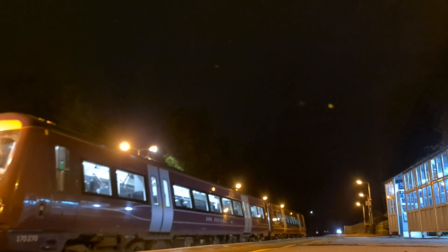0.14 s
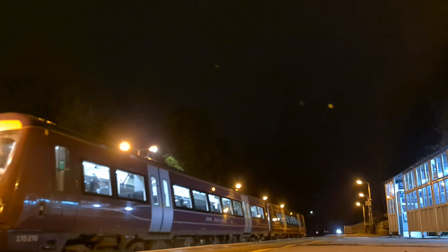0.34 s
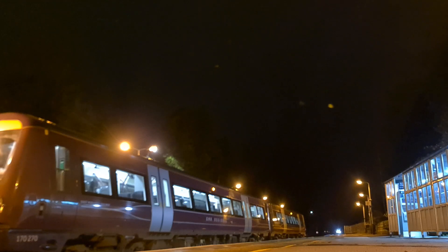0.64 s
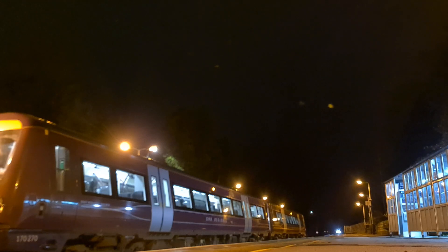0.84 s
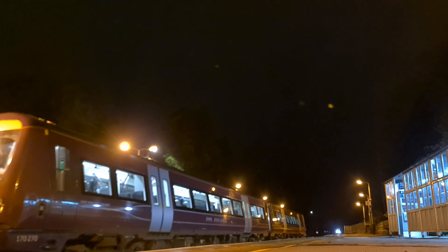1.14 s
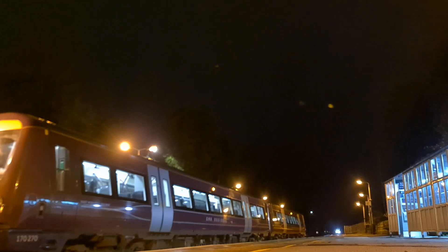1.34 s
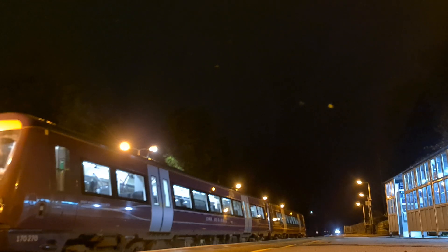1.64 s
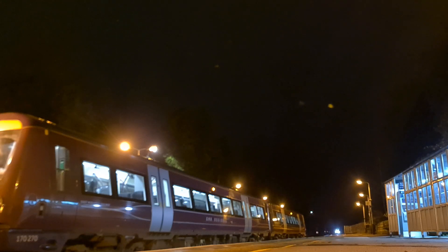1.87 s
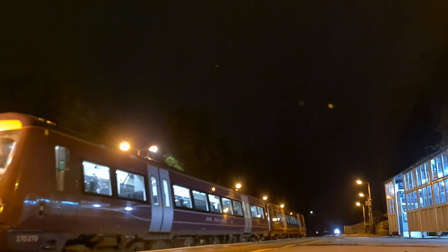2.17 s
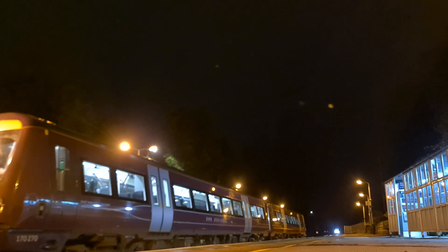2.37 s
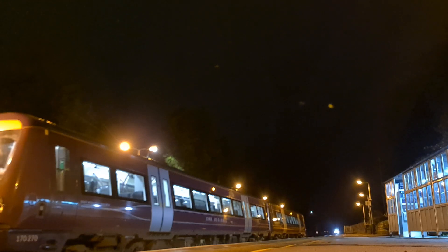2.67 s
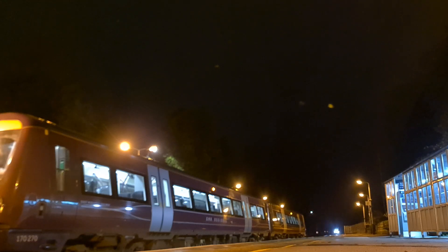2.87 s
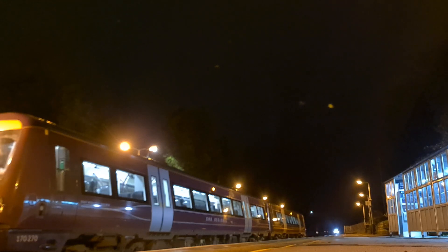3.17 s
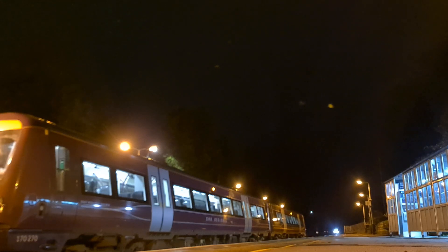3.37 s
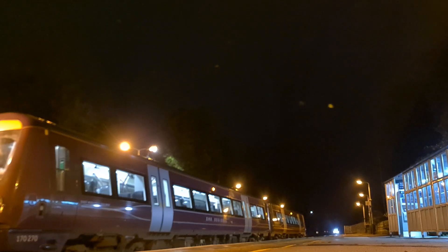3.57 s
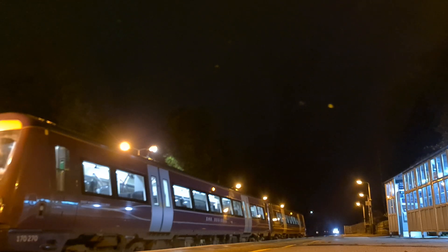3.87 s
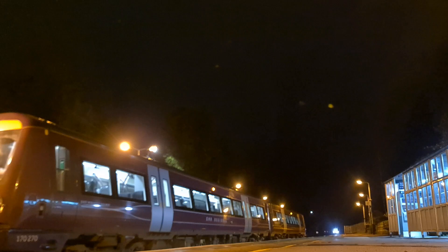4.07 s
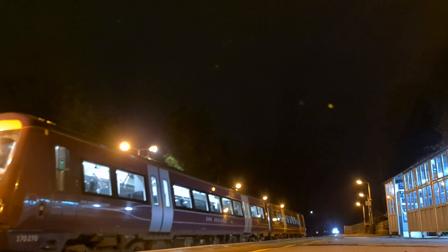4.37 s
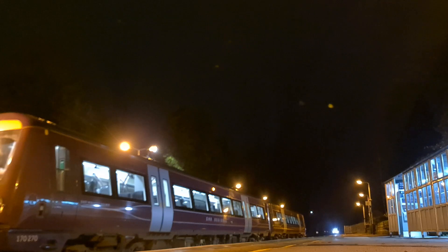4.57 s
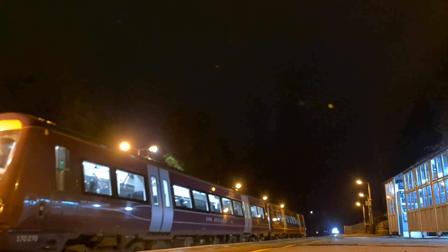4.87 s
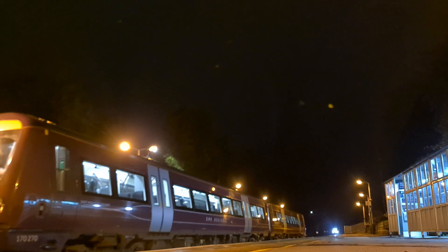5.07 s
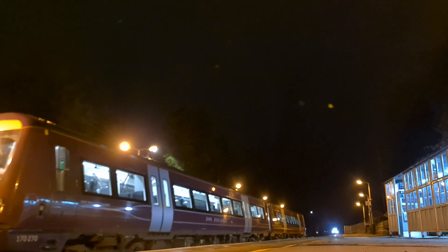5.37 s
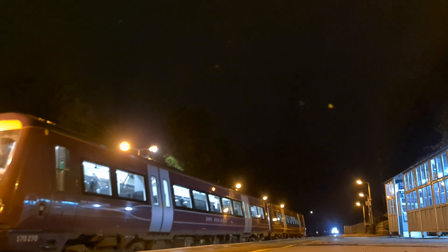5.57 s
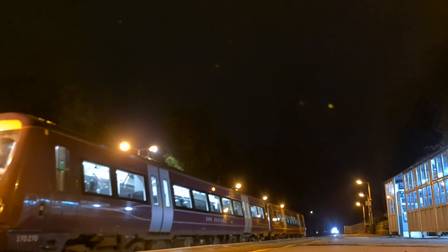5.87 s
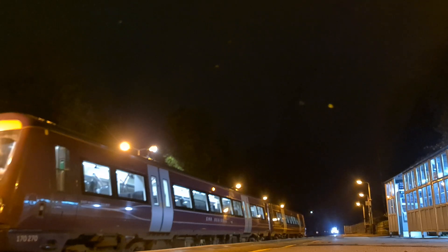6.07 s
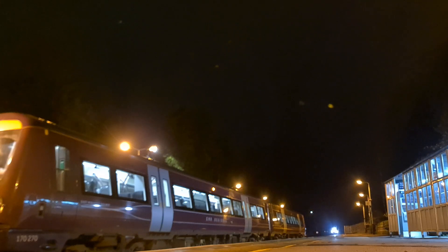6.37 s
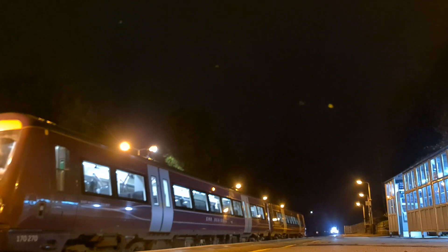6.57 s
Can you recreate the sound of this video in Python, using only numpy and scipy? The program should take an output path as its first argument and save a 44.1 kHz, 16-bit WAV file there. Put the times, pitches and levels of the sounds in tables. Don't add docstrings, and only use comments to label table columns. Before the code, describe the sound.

Two brief echoing horn toots, high then low, over a steady diesel idle; then distant locomotive throb and rail hiss swell steadily nearer.

```python
import sys
import numpy as np
from scipy import signal
from scipy.fft import rfft, irfft, next_fast_len
from scipy.io import wavfile
from scipy.ndimage import uniform_filter1d

SR = 44100
rng = np.random.default_rng(int(sys.argv[2]) if len(sys.argv) > 2 else 0)


def field_ratio(decibels):
    return 10 ** (np.asarray(decibels, dtype=float) / 20)


def digitize_waveform(pressure):
    field = np.atleast_2d(pressure).T
    bounded = np.clip(field, -1, 1)
    quanta = np.round(bounded * 32767).astype(np.int16)
    wavfile.write(sys.argv[1], SR, quanta)


N = 295911

# time in seconds, leading engine, trailing engine and rolling noise in dB,
# 0 = as loud as near the end.
APPROACH = [(0, -26, -20, -32), (1.2, -18.5, -15, -20.5), (2.2, -31.5, -13, -32), (3.1, -10.5, -9.5, -17.5),
            (3.8, -14.5, -2.5, -12), (4.4, -6.5, -6.5, -9.5), (4.9, 0.5, -1.5, -12), (5.5, 1, -3, -10.5),
            (5.9, -3.5, -2.5, -7.5), (6.15, -1.5, -0.5, -6), (6.32, 0, 4, -2.5), (6.5, -4.5, 4, -1.5),
            (6.71, -12, 4, 2.5)]
PORT_LAG_SAMPLES = 7.0


def read_log_hz(hz, at_hz, value):
    return np.interp(np.log(hz + 1), np.log(np.array(at_hz) + 1), value)


def evened(x):
    return x / np.sqrt(np.mean(x ** 2) + 1e-20)


def drift(rate_hz, t):
    coarse_t = t[::64]
    wander = sum(np.sin(2 * np.pi * (hz * coarse_t + rng.random())) / np.sqrt(hz)
                 for hz in np.geomspace(rate_hz / 20, rate_hz, num=20))
    return np.interp(t, coarse_t, evened(wander))


def ports(x, lag_samples, balance_db):
    size = next_fast_len(len(x))
    delay = np.exp(-2j * np.pi * np.fft.rfftfreq(size) * lag_samples)
    left = irfft(rfft(x, size) * delay, size)[:len(x)]
    return np.array([left * field_ratio(balance_db / 2), x * field_ratio(-balance_db / 2)])


def bell(hz, centre_hz, width_hz):
    return 1 / (1 + ((hz - centre_hz) / (width_hz / 2)) ** 2)


def band(x, centre_hz, width_hz):
    hz = np.fft.rfftfreq(len(x), 1 / SR)
    return irfft(rfft(x) * bell(hz, centre_hz, width_hz), len(x))


def noise(shape, size, patchy_db, peaks=()):
    # frequency in Hz, likeness of the ports 0-1, left-right balance in dB.
    port_match = [(60, .99, -.3), (180, .93, -.4), (350, .9, -.3), (620, .74, 0), (1000, .21, .4),
                  (1800, .41, 0), (3300, .54, -2.4), (4800, .22, -2.4), (8000, .2, -4.5), (10500, .05, -2),
                  (14000, .05, -.5)]
    frames = 4 * N // size + 5
    hz = np.fft.rfftfreq(size, 1 / SR)
    a, b, c, d, patches = rng.standard_normal((frames, len(hz), 5)).T
    patches = uniform_filter1d(patches, size=9, axis=0)
    patches = evened(uniform_filter1d(patches, size=7, axis=1))

    at_hz, same, balance_db = np.transpose(port_match)
    same = np.clip(read_log_hz(hz, at_hz, same), 0, 1)[:, None]
    lag = np.exp(-2j * np.pi * hz * PORT_LAG_SAMPLES / SR)[:, None]
    right = a + 1j * b
    left = same * lag * right + np.sqrt(1 - same ** 2) * (c + 1j * d)
    tilt = field_ratio(read_log_hz(hz, at_hz, balance_db) / 2)[:, None]

    db = read_log_hz(hz, *np.transpose(shape))
    db = db + sum(gain_db * bell(hz, f, width_hz) for f, width_hz, gain_db in peaks)
    spectra = np.array([left * tilt, right / tilt]) * field_ratio(db[:, None] + patchy_db * patches)
    return evened(signal.istft(spectra, nperseg=size, noverlap=3 * size // 4)[1][:, :N])


def railcar(t):
    # frequency in Hz, density in dB per Hz.
    idle_shape = [(24, -13), (45, -4.5), (95, -10.5), (220, -14), (420, -15), (580, -19.5), (1000, -19.5),
                  (1550, -24.5), (2200, -30.5), (4400, -40), (5300, -48.5), (7200, -60.5), (12000, -64),
                  (15700, -73)]
    # frequency in Hz, width in Hz, gain in dB.
    panels = [(1094, 140, 7.5), (1361, 110, 4), (1761, 140, 8.5), (830, 46, 5), (4760, 65, 11),
              (157, 27.4, -12.5), (2600, 260, 2), (9030, 1200, 6.5)]
    # frequency in Hz, rms level in dB.
    hum_lines = [(40.05, -44), (81.7, -47), (120, -49), (179.8, -51), (196, -53), (211, -52), (229, -53),
                 (240.2, -51), (245.4, -50), (294, -55), (360, -57), (408, -58)]
    firing_hz, idle_db = 39.8, -33.5
    firings = np.cumsum(firing_hz * (1 + 0.025 * drift(6, t))) / SR
    knock = 1 + 0.055 * np.cos(2 * np.pi * firings)
    knock += 0.016 * np.cos(2 * np.pi * firings / 6)
    level = field_ratio(idle_db + 0.6 * drift(4.4, t))
    body = level * knock * noise(idle_shape, 2048, patchy_db=1.17, peaks=panels)

    hum = np.zeros(len(t))
    for hz, db in hum_lines:
        phase = 2 * np.pi * hz * t + 0.73 * drift(1.48, t) + 6 * rng.random()
        hum += field_ratio(db + 2.1 * drift(1.76, t)) * np.sqrt(2) * np.sin(phase)
    return body + ports(hum, PORT_LAG_SAMPLES, -.4)


def engine_throb(t):
    # engine cycles per second, first strong firing in seconds.
    engines = [
        (8.14, .021),
        (7.8, .114),
    ]
    exhaust_orders = [
        [4, 5, 6, 7, 8, 9],
        [5, 6, 7, 8, 11, 11.5, 15, 16, 17, 27, 31.5, 38],
    ]
    # rms level when near in dB, share of the swell.
    order_levels = [
        [(-50.5, .3), (-38.5, .5), (-51.5, .1), (-25, 1.02), (-28, 0.73), (-47, 0.61)],
        [(-33, 1.26), (-43.5, .8), (-35.5, .7), (-49.5, 0.71), (-38.5, 1.1), (-42.5, 1.2), (-44, 1.4),
         (-44, 2.5), (-45, 2.4), (-46.5, 1.5), (-44, 1.43), (-50.5, 1)],
    ]
    # frequency in Hz, rms level when near in dB, share of the swell.
    fan = (49.9, -35, 0.68)
    # time in seconds, level in dB, frequency in Hz,
    # time to crest in seconds.
    thuds = [(.43, -31, 48, 0.018), (1.685, -28, 49.3, 0.023), (2.1, -30.5, 45.6, 0.063),
             (2.5, -33, 45, 0.039), (3.125, -23, 49.9, 0.039), (3.93, -33, 51.7, 0.032)]
    s, *near_db, _ = np.transpose(APPROACH)
    throb = np.zeros(len(t))
    for (cycle_hz, first_s), orders, levels, swell_db in zip(engines, exhaust_orders, order_levels, near_db):
        turns = cycle_hz * (t - first_s) + 0.0039 * drift(1.5, t)
        swell_db = np.interp(t, s, swell_db)
        for k, (db, share) in zip(orders, levels):
            stray = (k > 9) * (rng.random() + .1 * drift(3, t))
            level = field_ratio(db + share * swell_db + 1.0 * drift(2.53, t))
            throb += level * np.cos(2 * np.pi * (k * turns + stray))

    hz, db, share = fan
    level = field_ratio(db + share * swell_db + 3 * drift(2.5, t))
    throb += level * np.cos(2 * np.pi * hz * t + 1.8 * drift(1.495, t))

    for at_s, db, hz, crest_s in thuds:
        u = np.maximum(t - at_s, 0) / crest_s
        throb += field_ratio(db) * u * np.exp(1 - u) * np.sin(2 * np.pi * hz * (t - at_s))
    return np.sqrt(2) * throb


def rolling(t):
    # frequency in Hz, density in dB per Hz.
    roar_shape = [(40, -21), (70, -0.5), (92, -3), (130, -2), (158, -13.5), (190, -6), (250, -3.5),
                  (320, -11.5), (400, -10.5), (520, -20), (800, -18.5), (1200, -23.5), (1600, -42.5),
                  (3300, -120)]
    # frequency in Hz, density in dB per Hz.
    hiss_shape = [(800, -44), (1400, 0), (1900, 4.5), (2250, -4), (3400, -0.5), (4100, 1), (4600, -6),
                  (5300, -12), (6300, -12.5), (7200, -24), (8700, -22), (10000, -31.5), (14000, -36),
                  (15700, -52)]
    roar_db, hiss_db, hiss_share = -25, -40, 0.84
    s, *_, rolling_db = np.transpose(APPROACH)
    rolling_db = np.interp(t, s, rolling_db)
    roar = field_ratio(roar_db + rolling_db + 0.99 * drift(9, t)) * noise(roar_shape, 2048, patchy_db=3.1)
    hiss_level = field_ratio(hiss_db + hiss_share * rolling_db + .5 * drift(6.7, t))
    return roar + hiss_level * noise(hiss_shape, 512, patchy_db=1.5)


def freight_train(t):
    throb = engine_throb(t[::8])
    throb = signal.resample_poly(throb, 8, 1, padtype="line")[:N]
    sway_db = 0.5 * drift(4, t) * np.array([[1], [-1]])
    return field_ratio(sway_db) * ports(throb, PORT_LAG_SAMPLES, -.3) + rolling(t)


def horn(t):
    # start in seconds, air pressure in dB, pitch in Hz, hold in seconds.
    blips = [
        (0.045, -19, 353, 0.026),
        (0.861, -19, 311.9, 0.017),
    ]
    # multiple of the pitch, level in dB.
    trumpets = [
        [(1, -21), (2, 0), (3, -7), (4, -9), (5, -18), (6, -22), (7, -12), (8, -20), (9, -20), (10, -19),
         (11, -22), (12, -24), (13, -28), (14, -38), (15, -42), (16, -43), (17, -43), (18, -46), (19, -50)],
        [(1, -25), (2, -4), (3, -4), (4, 0), (5, -6), (6, -2), (7, -10), (8, -12), (9, -11), (10, -19),
         (11, -23), (12, -21), (13, -24), (14, -29), (15, -27), (16, -30), (17, -40), (18, -37), (19, -38),
         (20, -41), (21, -42), (22, -43), (23, -44), (24, -47), (25, -49)],
    ]
    rise_s, rise_db = 0.01, -27
    sag_s, sag_db = 0.025, -10
    shut_s, shut_db = 0.025, -25.5
    sharp, settle_s = 0.0784, 0.00924
    out = np.zeros(len(t))
    for (start_s, db, hz, hold_s), overtones in zip(blips, trumpets):
        valve_s = np.cumsum([0, rise_s, hold_s, sag_s, shut_s])
        u = np.arange(0, valve_s[-1], 1 / SR)
        slack_db = np.interp(u, valve_s, [rise_db, 0, -1.5, sag_db, sag_db + shut_db])
        bend = sharp * np.exp(-(u / settle_s) ** 2) + .0012 * drift(299.2, u)
        turns = np.cumsum(hz * (1 + bend)) / SR
        stack = np.zeros(len(u))
        for k, gain_db in overtones:
            flutter_db = 2.5 * drift(208, u)
            level = field_ratio(gain_db + k * (0.27 + 0.032 * slack_db) + flutter_db)
            stack += level * np.sin(2 * np.pi * (k * turns + rng.random()))
        air = band(band(rng.standard_normal(len(u)), 3200, 2600), 3200, 2600)
        blip = evened(stack) + field_ratio(-26) * evened(air)
        out[round(start_s * SR):][:len(u)] = field_ratio(db + slack_db) * blip
    return out


def station(x):
    # delay in seconds, level in dB, centre in Hz, width in Hz, #
    # left lag in samples, left-right balance in dB.
    walls = [(.001, -10, 3500, 4000, 0., -2), (.022, -15, 3000, 2500, 3., -1),
             (.046, -20, 1300, 2500, -4., 0), (.075, -18, 600, 700, 5., 0), (.15, -12, 1100, 1800, 3., 0),
             (.205, -12.5, 2000, 4500, -4., 2), (.27, -15, 3500, 5000, 1., 0), (.27, -13, 650, 500, 0., 0),
             (.44, -19, 2900, 2600, 5., -2)]
    # frequency in Hz, 60 dB decay time in seconds.
    yard = [(300, 6.9), (1000, 0.48), (3000, 1), (8000, 0.22)]
    out = ports(x, 6.0, -1.5)
    for delay_s, db, hz, width_hz, lag_samples, balance_db in walls:
        facets = rng.standard_normal(700) * (rng.random(700) < .03) * np.exp(-np.arange(700) / 300)
        facets[0] = 3
        facets /= np.linalg.norm(facets)
        echo = band(band(x, hz, width_hz), hz, width_hz)
        echo = signal.oaconvolve(echo, facets)[:len(x)]
        out += field_ratio(db) * ports(np.roll(echo, round(delay_s * SR)), lag_samples, balance_db)

    taps = rng.choice([-1., 1.], (2, SR)) * (rng.random((2, SR)) < 1500 / SR)
    hz, s, spectra = signal.stft(taps, SR, nperseg=256)
    decay_s = read_log_hz(hz, *np.transpose(yard))[:, None]
    tail = signal.istft(spectra * field_ratio(-60 * s / decay_s), SR, nperseg=256)[1]
    tail /= np.linalg.norm(tail[0])
    return out + field_ratio(-12.5) * signal.fftconvolve(x[None], tail, axes=1)[:, :len(x)]


def grit(t):
    # time in seconds, peak level in dB, centre in Hz, width in Hz, left-right balance in dB.
    ticks = [(1.0935, -35, 9000, 5000, 0), (1.097, -42, 9500, 9000, 0), (1.104, -46, 12000, 8000, 0),
             (1.1828, -44, 7300, 4000, 0), (1.3589, -54, 9500, 4000, 0), (1.3985, -42, 5500, 9000, 0),
             (1.402, -46, 13000, 9000, 0), (5.969, -37, 10500, 8000, 0), (5.9712, -35, 5000, 12000, 0),
             (5.9748, -29, 2500, 9000, 0), (5.9842, -40, 10000, 7000, 0), (6.275, -55, 11000, 6000, 0)]
    # start, peak and end in seconds, level in dB.
    scuffs = [(1.065, 1.097, 1.14, -57), (1.335, 1.36, 1.385, -70), (1.39, 1.4, 1.415, -65),
              (5.964, 5.995, 6.045, -60), (5.5, 5.54, 5.62, -71), (6.255, 6.275, 6.3, -67)]
    out = np.zeros((2, N))
    u = np.arange(1024) / SR
    for at_s, db, hz, width_hz, balance_db in ticks:
        burst = rng.standard_normal(1024) * np.exp(-abs(u - .002) / .0004)
        tick = band(burst, hz, width_hz)
        at = round((at_s - .002) * SR)
        out[:, at:at + 1024] += field_ratio(db + 2.0) * ports(tick / abs(tick).max(), 0.55, balance_db)

    stroke = sum(field_ratio(db) * np.interp(t, [start_s, peak_s, end_s], [0, 1, 0]) ** 1.5
                 for start_s, peak_s, end_s, db in scuffs)
    grains = rng.standard_normal((2, N)) * field_ratio(1.9 * rng.exponential(1, N))
    grains = grains * (rng.random((2, N)) < 6000 / SR)
    grains = grains + grains[::-1] / 2
    return out + stroke * evened(np.array([band(g, 9800, 5000) for g in grains]))


def scene():
    t = np.arange(N) / SR
    blips = np.zeros((2, N))
    blips[:, :3 * SR] = station(horn(t[:3 * SR]))
    return railcar(t) + freight_train(t) + blips + grit(t)


def low_pass(x):
    return signal.sosfilt(signal.butter(12, 15730, fs=SR, output="sos"), x)


def record(dry):
    # frequency in Hz, width in Hz, gain in dB.
    mic_dip = (7830, 270, -8)
    size = next_fast_len(N)
    hz = np.fft.rfftfreq(size, 1 / SR)
    dip_hz, width_hz, db = mic_dip
    gain = field_ratio(db * bell(hz, dip_hz, width_hz))
    return low_pass(irfft(rfft(dry, size) * gain, size)[:, :N])


dry = scene()
out = record(dry)
digitize_waveform(out)
```